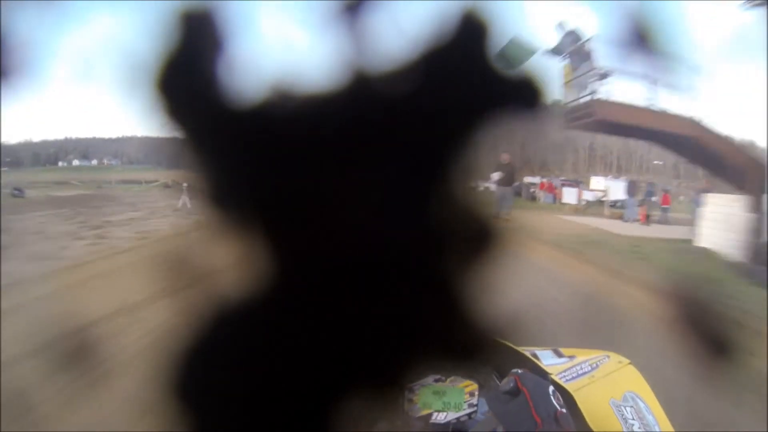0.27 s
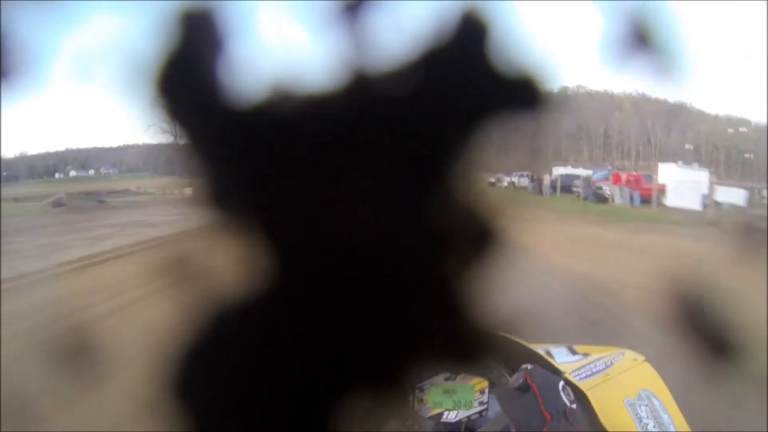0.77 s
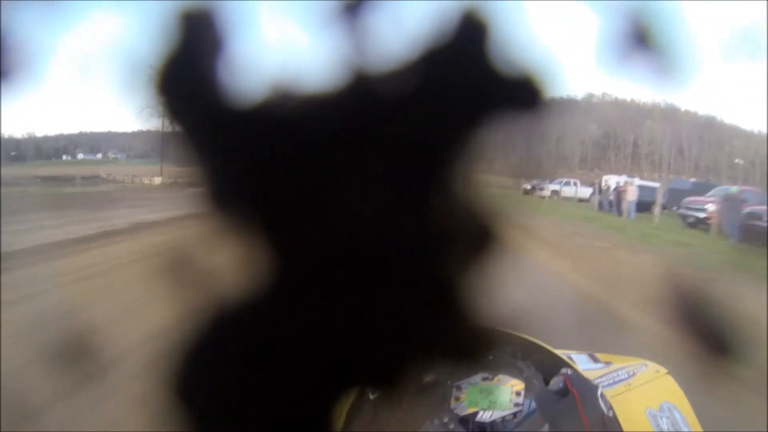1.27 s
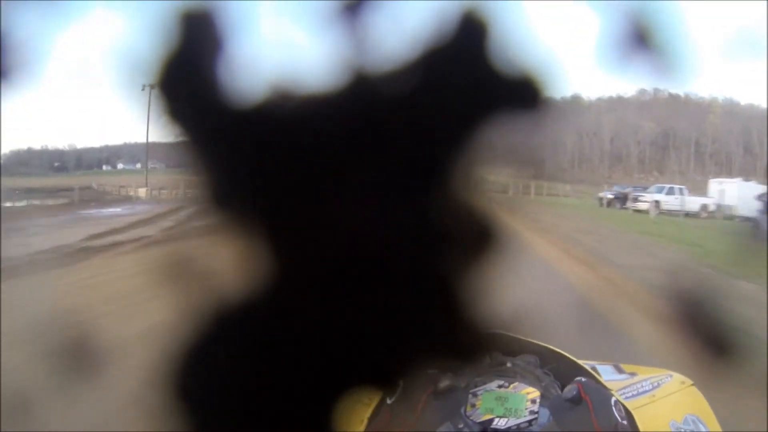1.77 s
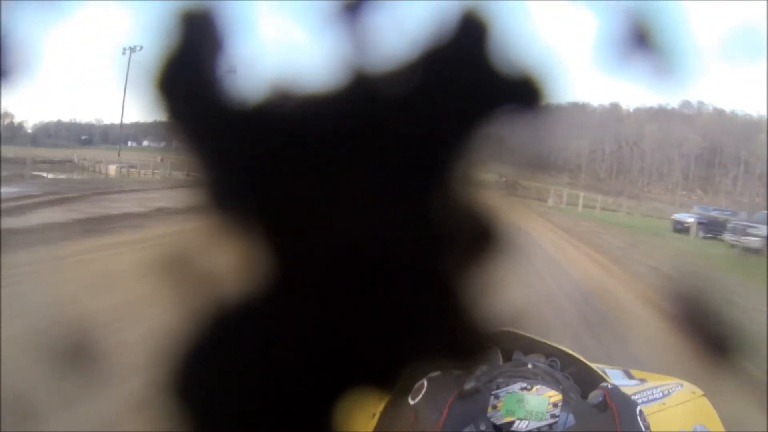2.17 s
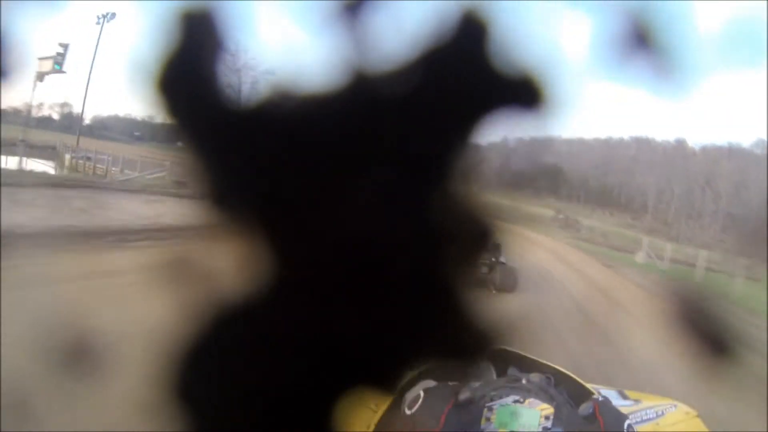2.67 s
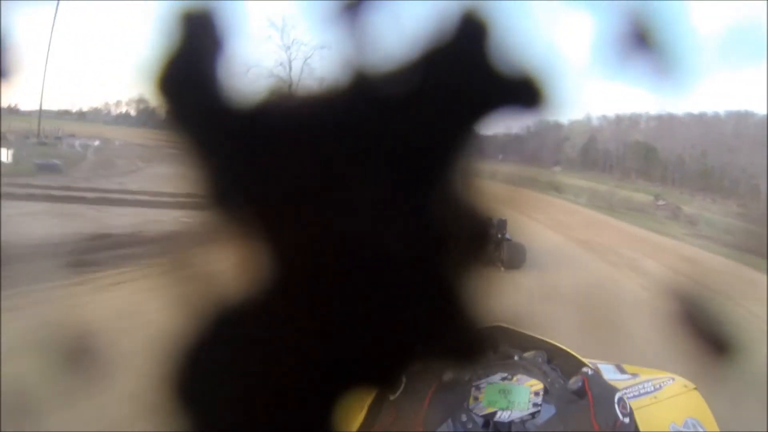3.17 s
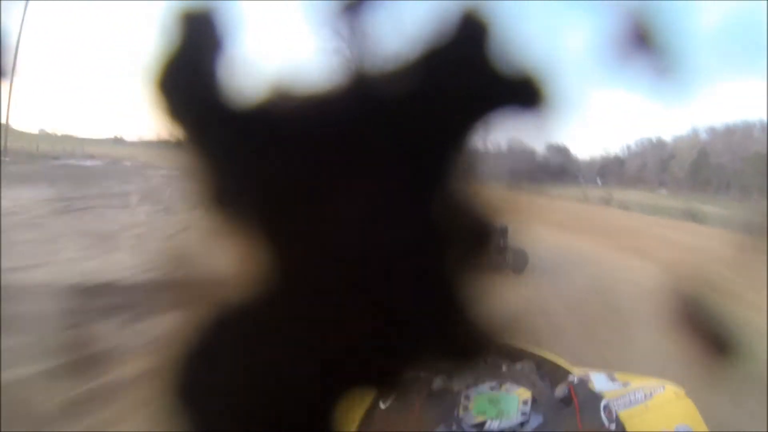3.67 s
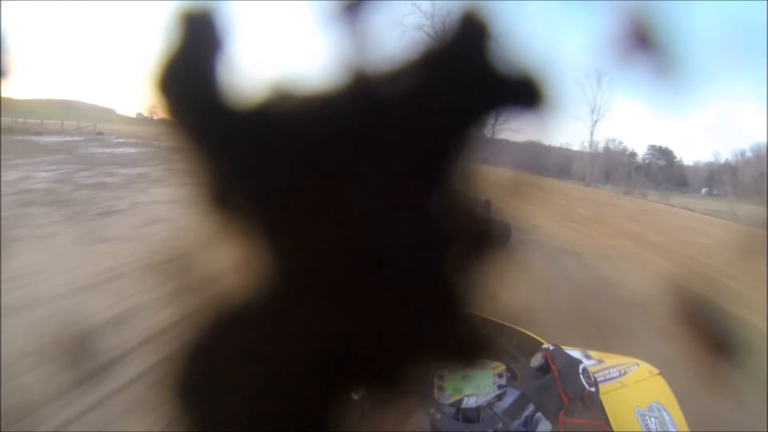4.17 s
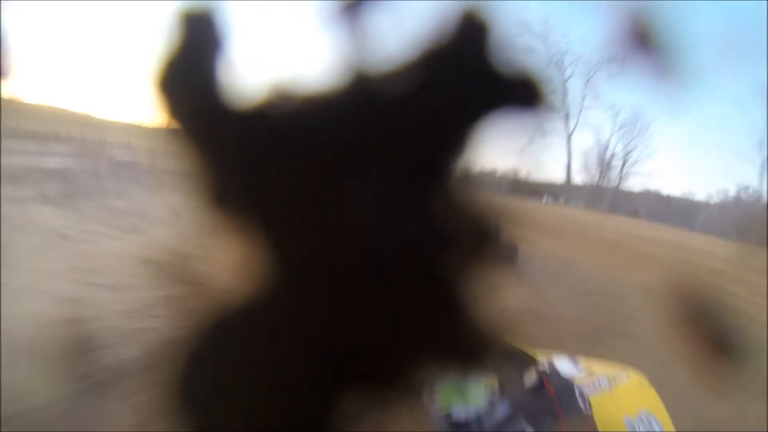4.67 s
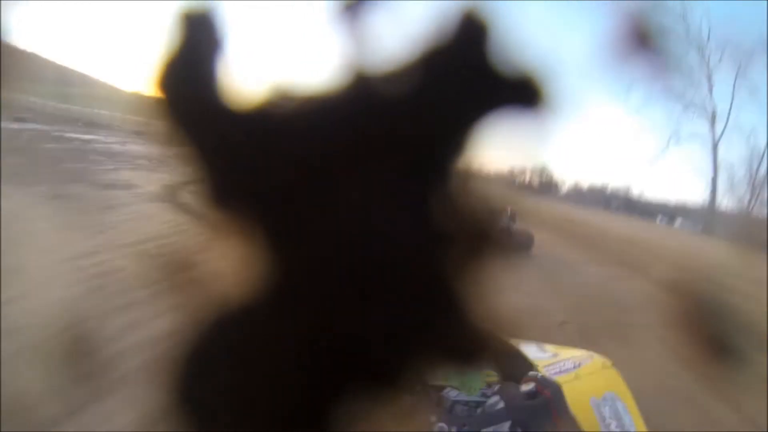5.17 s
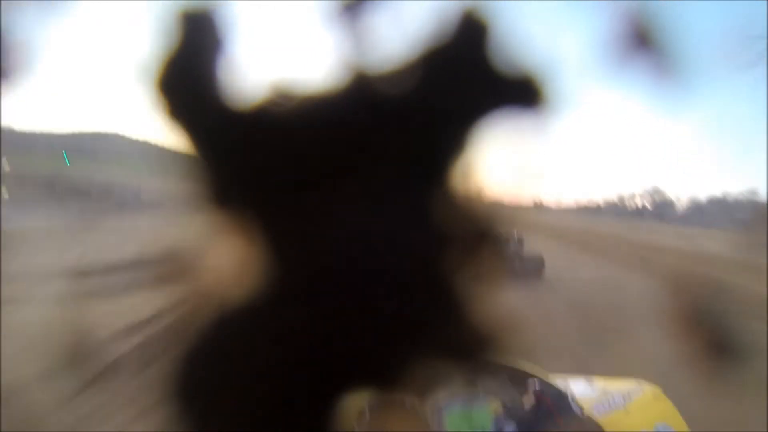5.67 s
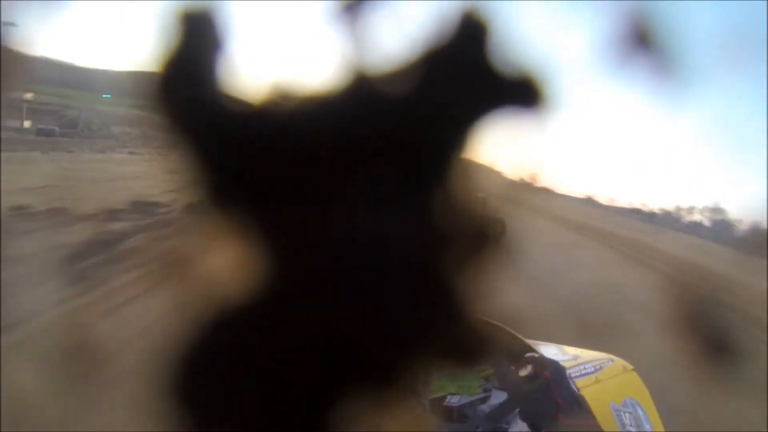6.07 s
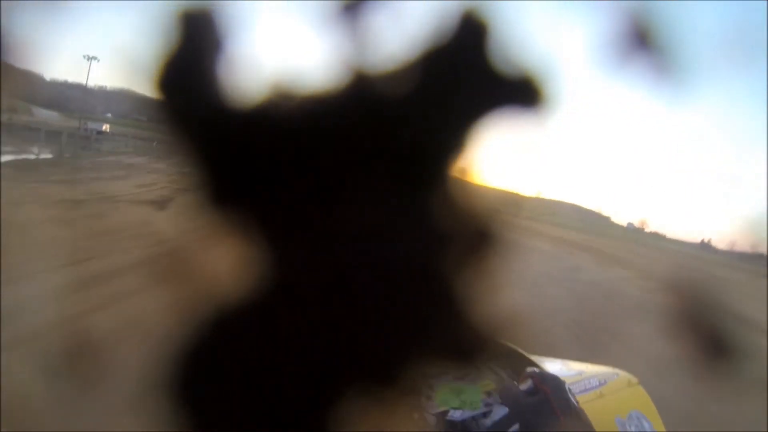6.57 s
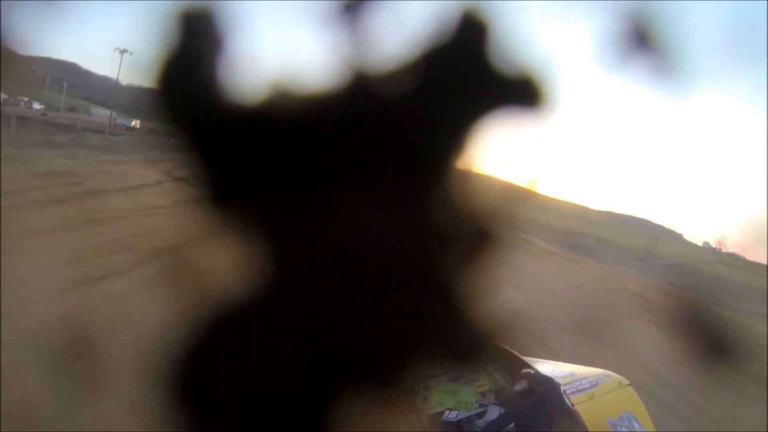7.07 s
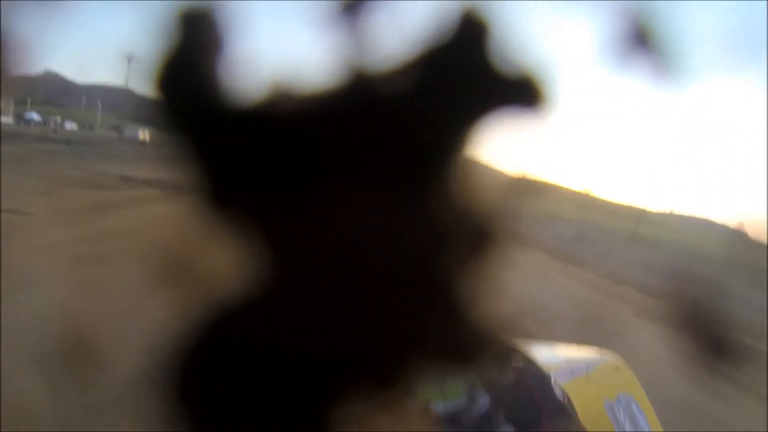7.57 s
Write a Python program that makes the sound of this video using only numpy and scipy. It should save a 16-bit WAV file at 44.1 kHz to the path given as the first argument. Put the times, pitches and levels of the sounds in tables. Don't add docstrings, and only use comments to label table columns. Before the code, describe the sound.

Very close onboard sound from a sealed camera on a dirt kart outdoors: raspy single-cylinder drone, mid-range roar, metallic clatter and thin fizz. Ruts boom through the mount and gusts thump. Grit patters and stones snap on the shell. The engine softens mid-way, a violent stone blow lands, then the engine recovers and drives on.

```python
import sys
import numpy as np
from scipy import signal
from scipy.fft import rfft, irfft, next_fast_len
from scipy.io import wavfile
from scipy.ndimage import uniform_filter1d, minimum_filter1d, map_coordinates

SR = 44100
rng = np.random.default_rng(int(sys.argv[2]) if len(sys.argv) > 2 else 0)


def waveform_to_disk(signal):
    frames = np.transpose(np.atleast_2d(signal))
    scaled = np.clip(frames, -1, 1) * 32767
    samples = np.round(scaled).astype(np.int16)
    wavfile.write(sys.argv[1], SR, samples)


def linear_from_db(decibels):
    return 10 ** (np.asarray(decibels, float) / 20)


N = 344848
T = np.arange(N) / SR

# time_s, load_db on engine and case, side_wind_db, track_roughness_db
RIDE = [(0, -1.5, -2.5, -0.5), (.2, 3, -1, -1), (.9, 1, -0.5, 0.5), (1.4, -1, -1, 0), (1.95, 1, -0.5, .5),
        (2.55, 1, -0.5, 1), (2.8, -1, 0.5, 2), (3.3, 0, -0.5, 0), (3.85, -1, 2.5, 1.5),
        (4.2, -2, 0.5, -0.5), (4.6, -1, 1, -0.5), (5.1, 0, 0.2, -0.5), (5.45, -2, 1, 0), (5.8, 0.9, 1, 0),
        (6.3, -0.2, 0.5, -.5), (6.9, -1.5, -2.5, 0.5), (7.3, -0.8, -2, .5), (7.82, -1, 0, 0.5)]

# frequency_hz, density_db per Hz
BUFFET_SPECTRUM = [(4.7, -30), (8.0, -0.5), (27, -2), (59, -6.5), (90, -5), (120, -29), (200, -120)]
# centre_s, strength_db
GUSTS = [(0.205, -19), (0.444, -19.5), (0.624, -18.5), (1.666, -23), (2.34, -20), (2.619, -22),
         (2.754, -21), (3.497, -22.5), (3.647, -29), (3.931, -30), (4.195, -29), (4.47, -18), (4.829, -19),
         (5.014, -27), (5.303, -12), (5.463, -17), (5.617, -16), (5.872, -26), (6.221, -17), (6.395, -23),
         (6.69, -17.5), (6.954, -20), (7.378, -17), (7.623, -19)]
# frequency_hz, width_hz, level_db
MOUNT_MODES = [(109, 18.8, 10.5), (145.6, 44, -9.5), (233, 26, -4.5)]
# centre_s, ring_db
RUTS = [(.19, -23), (.439, -20), (.634, -18.5), (.778, -22.5), (1.561, -23), (1.966, -17.5), (2.211, -22),
        (2.619, -23), (2.95, -20), (3.022, -21.5), (3.187, -13.5), (3.536, -27), (3.738, -16),
        (3.871, -17.5), (4.041, -13), (4.25, -17.5), (4.366, -21), (4.864, -21.5), (5.141, -18.5),
        (5.245, -13), (5.673, -23), (6.066, -18.5), (6.49, -16.5), (6.62, -19), (6.785, -14), (7.059, -30),
        (7.138, -27), (7.234, -21), (7.493, -19), (7.633, -25)]
# start_s, peak_db, swing_hz
JOLT = (4.455, -6, 27)
BUFFET_DB, BUFFET_FOLLOWS = -26.5, 0.9
BOOM_DB, BOOM_FOLLOWS = -27.5, 1.5
GUST_HALF_S, GUST_HZ, GUST_SPREAD = 0.039, 36, 0.265
RUT_HALF_S, RUT_HZ, RUT_SPREAD = 0.03, 109.2, 0.032

SHOWER_TIMES = [
    2.9,
    3.45,
    4.14,
    5.05,
    7.55,
]
# level_db, half_length_s
SHOWER_SIZES = [(-30, .04), (-31, 0.34), (-28, 0.077), (-27.5, 0.056), (-35, 0.067)]
# start_s, peak_db
GRIT = [(4.976, -18), (5.009, -18), (5.028, -16), (4.3, -11), (5.0545, -9), (5.0675, -7), (1.3149, -17),
        (.5028, -4), (6.766, -23)]

# start_s, peak_db, ring_hz, ring_width_hz, snap_db
STONES = [(0.2037, 2, 2200, 900, 4), (.9123, -13, 2300, 900, 10), (2.2963, 9.5, 2900, 1000, -2),
          (2.2975, 3, 3500, 1000, -20), (3.7597, 3.5, 1950, 280, 9), (3.7807, -5, 1800, 220, -6),
          (4.184, -12, 2200, 900, 6), (4.3346, 2.5, 3500, 1500, 18), (5.1997, 13.5, 1300, 650, -14),
          (5.2006, 11, 2900, 900, -14), (5.2016, 17.5, 2330, 330, -20), (5.2025, 12, 3400, 900, -18),
          (5.204, -5, 225, 30, -60), (5.641, -22, 970, 30, -40), (5.643, -17, 480, 90, -50),
          (5.644, -14, 250, 80, -50), (6.075, -3, 2180, 900, 14), (6.561, -19, 2220, 880, 12),
          (7.5657, -13, 2200, 900, 10)]
# frequency_hz, width_hz, level_db
SHELL_MODES = [(4700, 1800, -7), (8300, 1500, 0), (11500, 2500, -4), (19000, 2000, 2)]
# start_s, blow_db, length_s
SHOVE = (5.2058, 48, .004)

# time_s, firing_hz
FIRING = [(0, 38), (.28, 37.9), (.61, 38.9), (1.11, 39.7), (1.96, 40.7), (2.46, 40.7), (3.2, 41.7),
          (3.9, 42.8), (4.2, 40.2), (4.5, 37), (5.1, 35.8), (5.4, 35.2), (6.03, 34.2), (6.58, 34.2),
          (7.01, 34.4), (7.32, 35.3), (7.82, 36)]
# time_s, throttle from 0 to 1
THROTTLE = [
    (0, 1),
    (2.55, 1),
    (2.8, .3),
    (4.4, .25),
    (4.7, .5),
    (5.3, 1),
    (7.82, 1),
]
# multiple of the firing rate, high_revs_db, low_revs_db
EXHAUST_ORDERS = [(1, -35, -33), (2, -35, -35), (3, -37, -37), (4, -42, -44), (5, -40, -47), (6, -47, -48),
                  (7, -42.5, -58), (8, -52, -60), (9, -47, -47), (10, -43, -40.5), (11, -46, -55),
                  (12, -46, -47), (13, -48, -45), (14, -52, -51), (15, -64, -52), (16, -60, -58),
                  (18, -54, -62), (19, -55, -59), (20, -66, -58), (22, -57, -62), (25, -58, -58)]
# frequency_hz, density_db per Hz
PIPE_SPECTRUM = [(80, -29), (130, -3.5), (180, -7), (300, -12.5), (420, -11), (530, -12), (610, -24.5),
                 (715, -19.5), (810, -26), (985, -14), (1120, -22), (1250, -27), (1620, -38), (2750, -120)]
# frequency_hz, density_db per Hz
CAVITY_SPECTRUM = [(650, -27), (1100, -27), (1170, -21.5), (1370, -7), (1550, -1), (1690, 2.5),
                   (1800, -0.5), (2150, -12.5), (2400, -17), (3120, -14.5), (5280, -120)]
# frequency_hz, width_hz, level_db
COVER_MODES = [(2653, 54, 4.5), (3353, 180, -4), (3935, 106, -4.5), (4290, 89, -1), (4630, 390, -11.5)]
# frequency_hz, width_hz, level_db
WALL_MODES = [(2360, 500, -4), (3395, 183, 5), (4060, 900, -3), (4710, 1300, -12)]
# frequency_hz, width_hz, level_db
SEAM_MODES = [(5110, 890, -7), (5960, 415, -4.5), (7150, 544, -1), (9100, 740, -6.5), (10360, 1230, -12.5)]
# frequency_hz, width_hz, level_db
TINWARE_MODES = [(9200, 350, -2), (10230, 650, 2), (11660, 780, -2.5), (13500, 1600, -7.5)]
ROAR_DB, CLATTER_DB, FIZZ_DB, EXHAUST_DB = -19.5, -29.5, -29.5, -31.5
CLATTER_OPEN_DB, EXHAUST_OPEN_DB, ROAR_PER_REV_DB = 2, -1.15, 0.28
CLATTER_FOLLOWS, EXHAUST_FOLLOWS, FIZZ_FOLLOWS = 0.35, 0.61, 0.3


def unit(x):
    return x / np.sqrt(np.mean(x ** 2) + 1e-20)


def curves(rows):
    s, *columns = np.transpose(rows)
    return [np.interp(T, s, column) for column in columns]


def wobble(rate_hz):
    knots = rng.standard_normal(int(N * rate_hz / SR) + 4)
    return map_coordinates(knots, [T * rate_hz])


def filtered(x, response):
    size = next_fast_len(len(x) + SR // 2)
    spectrum = rfft(x, size) * response(np.fft.rfftfreq(size, 1 / SR))
    return irfft(spectrum, size)[:len(x)]


def coloured(x, points):
    f, db = np.transpose(points)
    return unit(filtered(x, lambda hz: linear_from_db(np.interp(np.log(hz + 1), np.log(f + 1), db))))


def ringing(x, modes):
    def response(f):
        total = 0
        for k, (centre, width, db) in enumerate(modes):
            loss = 1j * f * width
            total = total + (-1) ** k * linear_from_db(db) * loss / (centre * centre - f * f + loss)
        return total
    return filtered(x, response)


def treble_only(hz):
    return 1 / np.sqrt(1 + (2100 / (hz + 1)) ** 6)


def swings(events, half_s, hz, spread):
    out, t = np.zeros(N + SR), np.arange(-SR // 4, SR // 4) / SR
    draws = rng.standard_normal((len(events), 2))
    for (s, db), (detune, phase) in zip(events, draws):
        swing = np.sin(2 * np.pi * hz * np.exp(spread * detune) * t + np.pi * phase)
        out[round(s * SR):][:len(t)] += linear_from_db(db) * np.exp(-(t / half_s) ** 2) * swing
    return out[SR // 4:][:N]


def wind_buffet():
    wind_db = curves(RIDE)[1]
    level_db = BUFFET_DB + BUFFET_FOLLOWS * wind_db + 1.7 * wobble(10)
    steady = linear_from_db(level_db) * coloured(rng.standard_normal(N), BUFFET_SPECTRUM)
    return steady + swings(GUSTS, GUST_HALF_S, GUST_HZ, GUST_SPREAD)


def mount_boom():
    rough_db = curves(RIDE)[2]
    level_db = BOOM_DB + BOOM_FOLLOWS * rough_db + 1.3 * wobble(13)
    shaken = ringing(rng.standard_normal(N), MOUNT_MODES)
    boom = linear_from_db(level_db) * unit(ringing(shaken, [(106, 80, 0)]))
    s, db, hz = JOLT
    cycles = np.maximum(T - s, 0) * hz
    jolt = -linear_from_db(db) * np.sin(2 * np.pi * cycles) * np.exp(-1.1 * cycles)
    return boom + swings(RUTS, RUT_HALF_S, RUT_HZ, RUT_SPREAD) + jolt


def sand():
    grains = rng.standard_normal(N) * linear_from_db(8.3 * rng.standard_normal(N))
    dense = unit(ringing(grains, [(3520, 12000, -4.5), (7200, 4600, 2.5), (10600, 2200, -3.5)]))
    shower = np.zeros(N)
    for s, (db, half_s) in zip(SHOWER_TIMES, SHOWER_SIZES):
        shower += linear_from_db(db) * np.exp(-((T - s) / half_s) ** 2)
    ticks = np.zeros(N)
    for s, db in GRIT:
        ticks[round(s * SR)] = -linear_from_db(db + 11)
    return shower * dense + ringing(ticks, SHELL_MODES)


def stones():
    out, pushes = np.zeros(N + SR), np.zeros(N)
    blow = -np.eye(1, 4096)[0]
    crumble = np.exp(-np.arange(len(blow)) / SR / 0.0011)
    for s, db, hz, width_hz, snap_db in STONES:
        ring = ringing(blow, [(hz, width_hz, 0)])
        ring = ringing(ring, [(hz, 4.8 * width_hz, 0)])
        gritty_blow = blow + 0.19 * rng.standard_normal(len(blow)) * crumble
        snap = ringing(gritty_blow, SHELL_MODES)
        crack = ring / np.abs(ring).max() + linear_from_db(snap_db) * snap / np.abs(snap).max()
        out[round(s * SR):][:len(blow)] += linear_from_db(db) * crack / np.abs(crack).max()
    start_s, blow_db, length_s = SHOVE
    pushes[round(start_s * SR)] = -linear_from_db(blow_db)
    rocking = ringing(uniform_filter1d(pushes, size=round(length_s * SR)), MOUNT_MODES)
    return out[:N] + rocking


def firing_noise(cycle, depth, fade, lag):
    cycle = cycle - lag + 1
    since = cycle % 1 / fade
    strengths = linear_from_db(2 * rng.standard_normal(int(cycle.max()) + 1))
    flare = strengths[cycle.astype(int)] * (since * np.exp(1 - since)) ** 2
    return rng.standard_normal(N) * (1 + depth * flare)


def case_clatter(cycle, throttle):
    cover = ringing(firing_noise(cycle, 2.2, 0.13, 0.04), COVER_MODES)
    walls = ringing(rng.standard_normal(N), WALL_MODES)
    cover, walls = unit(filtered(cover, treble_only)), unit(filtered(walls, treble_only))
    share = 0.67 * throttle
    return np.sqrt(share) * cover + np.sqrt(np.abs(1 - share)) * walls


def thin_fizz(cycle, throttle):
    seams = ringing(firing_noise(cycle, 0.7 * throttle, 0.15, 0.05), SEAM_MODES)
    tinware = ringing(firing_noise(cycle, 1.35 * throttle, 0.15, 0.02), TINWARE_MODES)
    both = unit(seams) + linear_from_db(-9 + 3.6 * throttle) * unit(tinware)
    return unit(filtered(both, treble_only))


def exhaust_tones(cycle, revs):
    tones = np.zeros(N)
    for order, high_db, low_db in EXHAUST_ORDERS:
        drift_db = 1.5 * wobble(4)
        slip = rng.uniform(0, 2 * np.pi) + 0.2 * wobble(3)
        size = linear_from_db(low_db + revs * (high_db - low_db) + drift_db + 4.2)
        tones += size * np.sin(2 * np.pi * order * cycle + slip)
    return tones


def engine():
    rate_hz = curves(FIRING)[0]
    cycle = np.cumsum(rate_hz) / SR
    revs = np.clip((rate_hz - 35) / (39 - 35), 0, 1)
    throttle = np.clip(curves(THROTTLE)[0], 0, 1)
    load_db, wind_db, rough_db = curves(RIDE)
    shake_db = 0.85 * wobble(22)
    roar_db = ROAR_DB + load_db + ROAR_PER_REV_DB * revs + 0.56 * wobble(6)
    clatter_db = CLATTER_DB + CLATTER_FOLLOWS * load_db + CLATTER_OPEN_DB * throttle + rough_db + shake_db
    exhaust_db = EXHAUST_DB + EXHAUST_FOLLOWS * load_db + EXHAUST_OPEN_DB * throttle + 1.3 * wobble(4.4)
    fizz_db = FIZZ_DB + FIZZ_FOLLOWS * load_db + wind_db + shake_db
    rush = coloured(firing_noise(cycle, 0.32 * throttle, 0.2, 0.39), PIPE_SPECTRUM)
    roar = coloured(firing_noise(cycle, 0.55 * throttle, 0.2, -0.05), CAVITY_SPECTRUM)
    out = throttle * exhaust_tones(cycle, revs)
    out += linear_from_db(exhaust_db) * rush + linear_from_db(roar_db) * roar
    out += linear_from_db(clatter_db) * case_clatter(cycle, throttle)
    return out + linear_from_db(fizz_db) * thin_fizz(cycle, throttle)


def scene():
    return (wind_buffet() + mount_boom() + sand() + stones() + engine())[None]


def roll_off(x):
    return signal.sosfilt(signal.butter(12, 16440, fs=SR, output="sos"), x)


def record(dry):
    need_db = np.minimum(0, -20 * np.log10(np.abs(dry[0]) + 1e-9))
    ahead = int(0.018 * SR)
    need_db = minimum_filter1d(need_db, ahead + 1, origin=-(ahead // 2))
    climb_db = 12.86 * T
    gain_db = np.minimum.accumulate(need_db - climb_db) + climb_db
    gain = linear_from_db(uniform_filter1d(gain_db, size=41))

    def port(hz):
        membrane = linear_from_db(-8 / (1 + (11950 / (hz + 1)) ** 60))
        return membrane / np.sqrt(1 + (hz / 15120) ** 160)
    mix = filtered(dry[0] * gain, port)
    return roll_off(mix[None])


dry = scene()
out = record(dry)
waveform_to_disk(out)
```